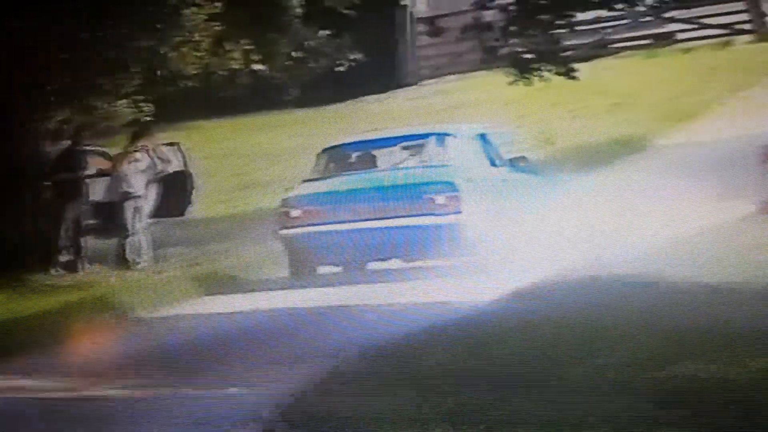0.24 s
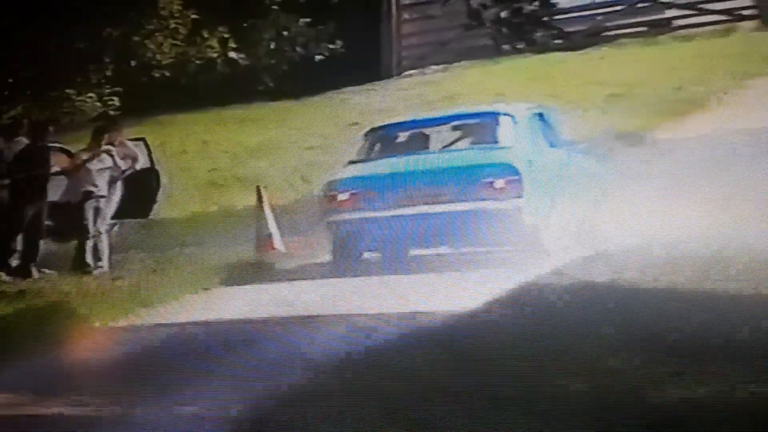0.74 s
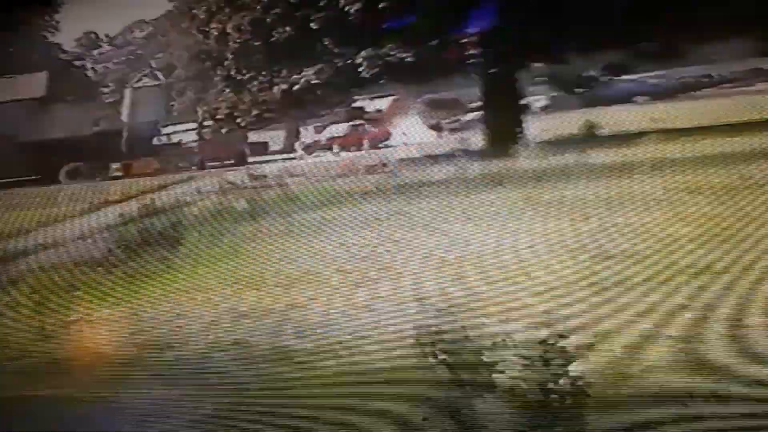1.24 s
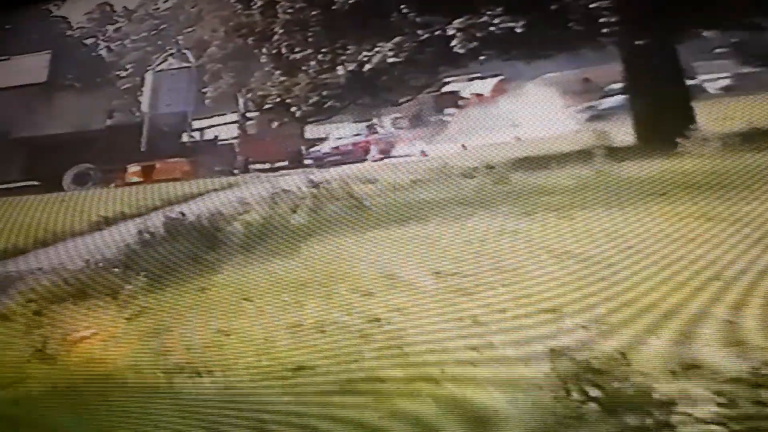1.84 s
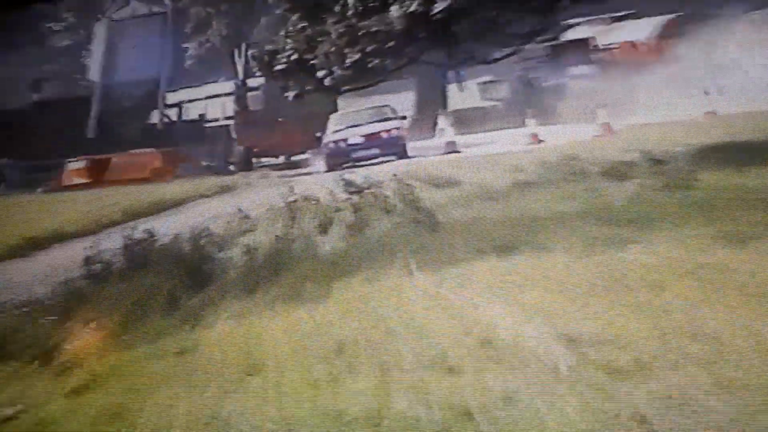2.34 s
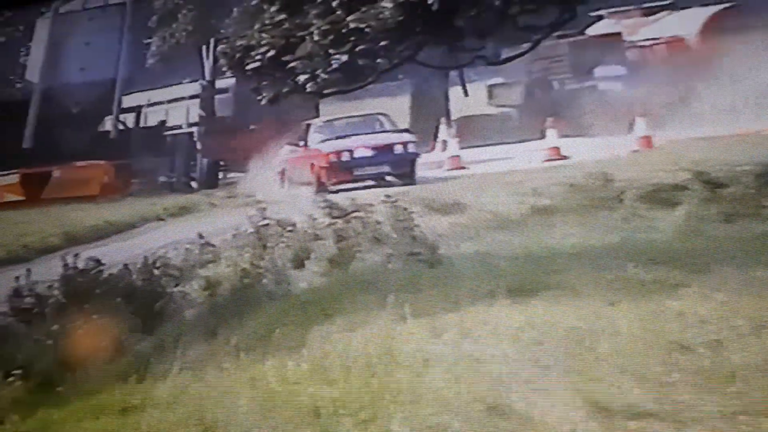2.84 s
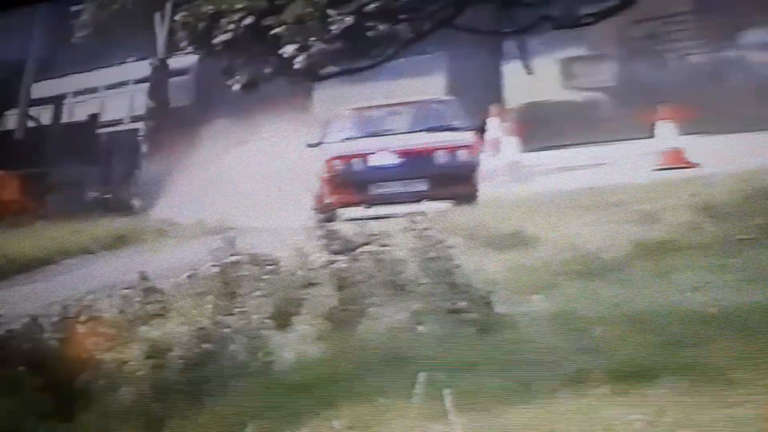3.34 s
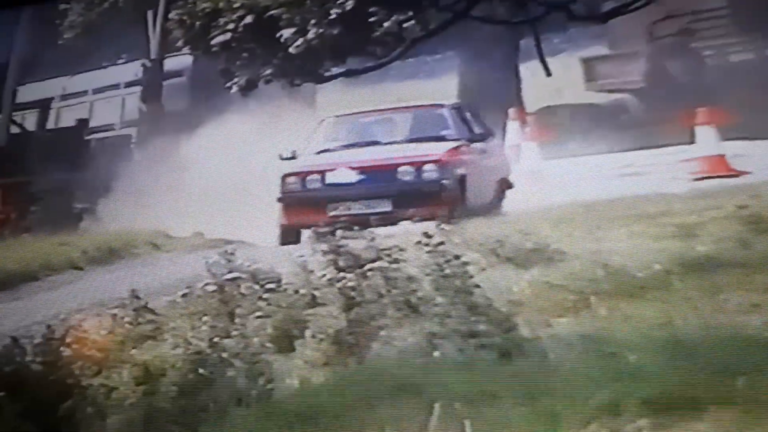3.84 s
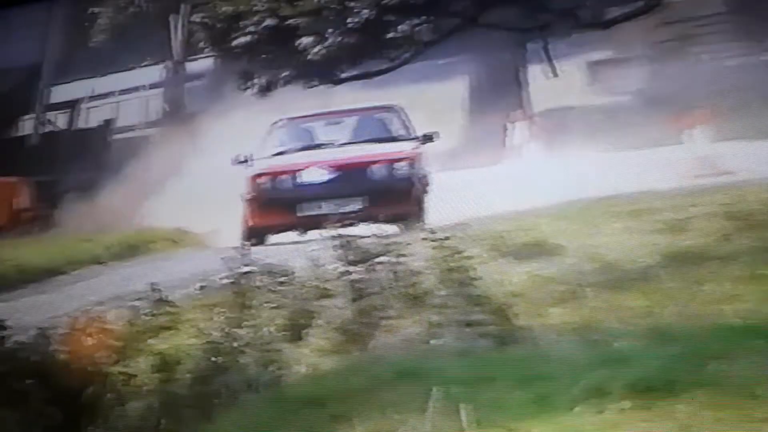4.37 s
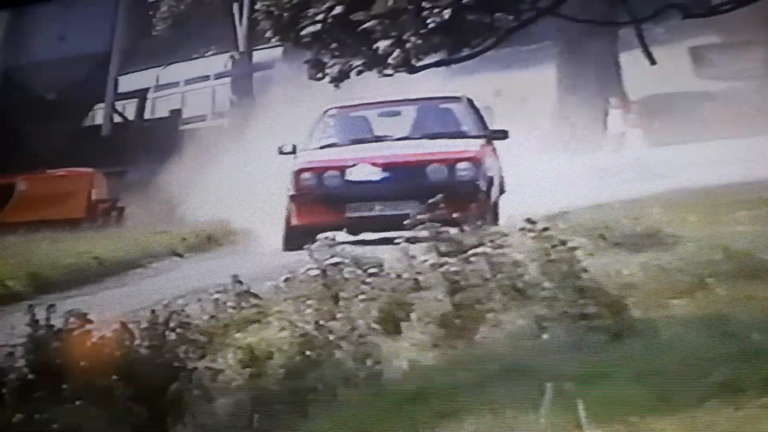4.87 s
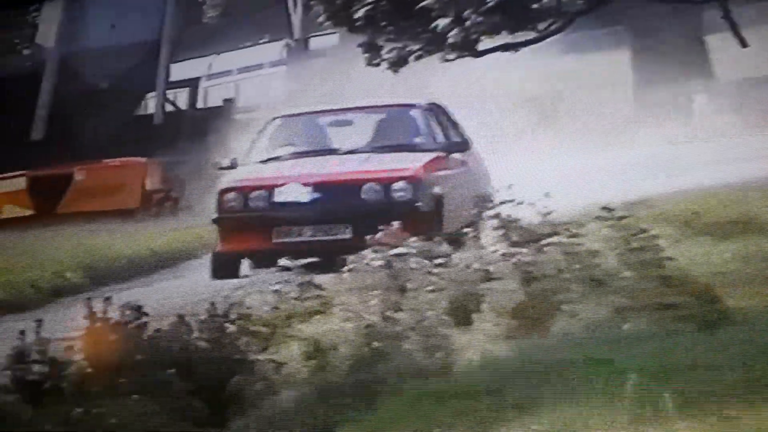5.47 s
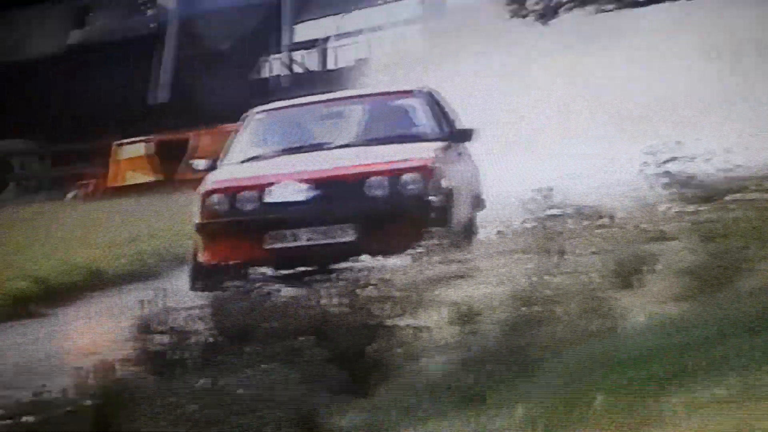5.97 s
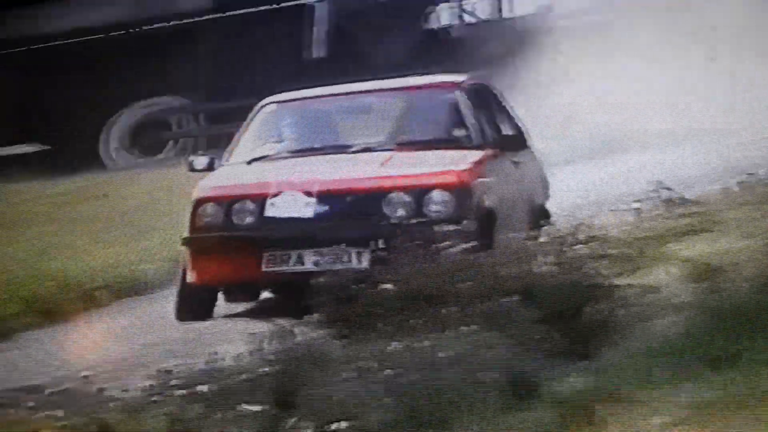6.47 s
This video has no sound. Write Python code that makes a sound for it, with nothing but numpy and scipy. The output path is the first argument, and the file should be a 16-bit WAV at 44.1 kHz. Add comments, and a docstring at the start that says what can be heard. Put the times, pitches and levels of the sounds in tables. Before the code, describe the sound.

Outdoors on a loose-surfaced track, tyres screech loudly at once and die away within a second. A low pop marks a sudden change to near quiet. A second car's engine builds from the distance, climbs in revs, drops and climbs again, sinks, then growls loudly close by. Gravelly exhaust roar, echoes and a few stone ticks surround it. The sound is thin and hollow, as through a small loudspeaker.

```python
"""A car engine revs up and down: shaft orders and firing-modulated noise, its firing tone beating against an echo.
Before it, tyres squeal away by stick-slip, several detuned tread blocks beating together; a low pop lies between.
Flung stones tick; a low rumble, a faint treble hiss and a steady room murmur lie beneath.
The engine, tyres and stones pass a comb of fixed notches; a small loudspeaker then sheds the deep bass of all."""
import sys
import numpy as np
from scipy import signal
from scipy.fft import rfft, irfft, next_fast_len
from scipy.io import wavfile
from scipy.ndimage import uniform_filter1d, minimum_filter1d, map_coordinates

SR = 44100
rng = np.random.default_rng(int(sys.argv[2]) if len(sys.argv) > 2 else 0)


def generate_wav(signal):
    """Clip the signal to [-1, 1] and save it as 16-bit WAV at the path in sys.argv[1]."""
    frames = np.transpose(np.atleast_2d(signal))
    scaled = np.clip(frames, -1, 1) * 32767
    pcm = np.round(scaled).astype(np.int16)
    wavfile.write(sys.argv[1], SR, pcm)


def voltage_ratio(decibels):
    """Convert decibels (scalar or array-like) to amplitude ratios, 20 dB per decade."""
    exponent = np.asarray(decibels, float) / 20
    return 10 ** exponent


N = 295911  # samples

# Source levels are those ahead of the notches, flutter and loudspeaker; spectra give gains ahead of rms scaling.
# Firing tone of the engine: [t/s, f/Hz, level/dB]
FIRING_TONE = [(1.3, 128, -48.5), (1.65, 136.8, -40), (1.93, 126.9, -40), (2.45, 160, -29.5),
               (2.56, 167.5, -22.5), (2.7, 170.6, -19.5), (2.83, 196.4, -14.5), (2.92, 197.8, -15),
               (3.0, 195.7, -16.5), (3.22, 204.8, -19), (3.38, 220, -13), (3.43, 212, -19),
               (3.48, 202, -12), (3.55, 198.3, -13.5), (3.7, 215, -14.5), (4.08, 241, -18.5),
               (4.2, 225, -20.5), (4.36, 199.2, -17.5), (4.57, 184.6, -18.5), (4.81, 157, -19),
               (5.06, 139.3, -24), (5.33, 148.5, -22), (5.47, 155.1, -13.5), (5.62, 154, -21.5),
               (5.74, 154.2, -12.5), (5.92, 159.3, -12.5), (6.06, 165.9, -12), (6.25, 165.7, -11.5),
               (6.37, 185, -9.5), (6.48, 173.4, -13.5), (6.57, 176.5, -6), (6.71, 182.6, -16.5)]
# Single orders that boom out for a while: [middle t/s, length/s, multiple of firing rate/1, level/dB]
ORDER_BOOMS = [(1.68, .3, 2, -34.5), (2.247, .3, 2, -35), (3.55, 0.23, 2, -32), (4.08, 0.16, 2, -20),
               (5.204, 0.24, 2, -26), (5.774, 0.22, 2, -25), (6.616, 0.17, 2, -23), (3.75, .25, .5, -39.5),
               (4.1, .2, .5, -35.5), (5.373, .95, 1.5, -24), (6.1, 0.47, 1.5, -30), (5.676, .6, 2.5, -25.5),
               (6.53, .2, 2.5, -20.5), (5.13, 0.16, 3, -25), (6.116, .35, 3, -23), (6.399, 0.079, 3, -24.5),
               (5.534, 0.14, 4, -17.5), (5.768, .12, 4, -21), (5.939, 0.14, 4, -16.5), (6.16, .18, 4, -18),
               (6.632, 0.14, 4, -22.5)]
# Firing tone thrown back by the buildings: [t/s, pitch over direct pitch/1, level/dB]
BUILDING_ECHO = [(2.62, 0.98, -15), (2.78, 1, -18), (2.9, .9, -33), (3.05, .94, -18), (3.4, .905, -31),
                 (3.53, .92, -27), (3.6, .94, -17), (3.8, .925, -16.5), (3.95, .915, -20.5),
                 (4.13, .905, -28.5), (4.4, .92, -39), (5.25, .94, -31), (5.6, .865, -28.5), (6.05, 1, -39)]
# Booms sent back by a farther wall: [middle t/s, length/s, multiple of firing rate/1, level/dB]
FAR_WALL_ECHO = [(4.33, .25, 1, -29), (4.65, 0.34, 1, -26.5), (4.21, .1, 2, -25), (6.36, .14, 4, -19),
                 (6.64, 0.39, 1, -19.5)]
# Exhaust pipe ringing when the throttle opens: [middle t/s, length/s, level/dB]
PIPE_RINGS = [(2.62, .2, -22), (2.994, .3, -24), (3.452, 0.28, -23), (3.823, .25, -23.5), (4.63, 0.12, -23)]
# Exhaust roar and tyres on loose ground: [t/s, body level/dB, upper level/dB]
ROAR_LEVELS = [(0.0, -34, -29), (0.07, -34, -27), (0.32, -33.5, -37), (1.03, -32, -40), (1.23, -33.5, -38),
               (1.31, -25.5, -37.5), (1.57, -21.5, -31.5), (2.15, -20.5, -28.5), (2.5, -20, -26.5),
               (2.95, -16, -24), (3.6, -18, -24), (4.2, -18.5, -21.5), (4.32, -19.5, -25),
               (5.1, -19, -27.5), (5.7, -17.5, -25), (6.06, -16.5, -23.5), (6.71, -15, -22)]
# Spectrum of the body of the roar: [f/Hz, gain/dB]
BODY_SPECTRUM = [(150, -80.5), (250, -23.5), (320, -6.5), (438, -4.5), (505, -2.5), (600, -2.5),
                 (670, -0.5), (740, -3.5), (830, -5), (900, -12), (1300, -16), (1700, -46.5), (2860, -120)]
# Spectrum of the upper part of the roar: [f/Hz, gain/dB]
UPPER_SPECTRUM = [(500, -40), (900, 0.5), (1200, -4), (1500, -5), (1910, -10), (2390, -18.5), (2650, -29.5),
                  (2850, -37.5), (3450, -37.5), (3750, -53.5), (4300, -60), (5000, -120)]
# Tread squeal: [t/s, centre f/Hz, fundamental level/dB]
TREAD_SQUEAL = [(0.0, 815, -13), (0.124, 812, -5.5), (0.17, 790, -15), (0.25, 783, -14.5), (0.3, 790, -23),
                (0.38, 812, -21.5), (0.44, 805, -27.5), (0.554, 794, -21.5), (0.62, 787, -28.5),
                (0.9, 775, -44)]
# Flung stones: [t/s, starting noise level/dB ahead of colouring]
STONE_HITS = [(.5876, -38), (3.7762, -25), (6.4972, -21)]
# Colour of a stone's tick, without rms scaling: [f/Hz, gain/dB]
STONE_COLOUR = [(1500, -59.5), (2800, -7.5), (3400, -3), (4100, -23.5), (5000, -0.5), (7000, -3.5), (8200, -35)]
# Low ground and body noise: [t/s, level/dB]
RUMBLE_LEVELS = [(0, -37), (1.2, -44), (1.6, -36.5), (2.3, -34.5), (2.7, -26), (4.5, -30.5), (5.8, -20.5),
                 (6.71, -21.5)]
# Spectrum of the rumble: [f/Hz, gain/dB]
RUMBLE_SPECTRUM = [(30, -55.5), (70, -28.5), (120, -11.5), (167, -2), (264, 0), (320, -15), (400, -40.5),
                   (600, -120)]
# Treble hiss: [t/s, level/dB]
HISS_LEVELS = [(0.0, -70), (1.3, -68), (1.69, -61.5), (2.81, -58.5), (4.06, -57.5), (4.95, -60),
               (5.64, -58.5), (6.71, -59)]
# Spectrum of the hiss: [f/Hz, gain/dB]
HISS_SPECTRUM = [(2500, -59.5), (3700, -16), (4350, -16), (4550, -4.5), (5300, -1), (5750, -3.5),
                 (6250, -1.5), (7400, -6), (8700, -19), (11500, -21), (12500, -24), (15700, -19.5)]
# Spectrum of the room murmur: [f/Hz, gain/dB]
ROOM_SPECTRUM = [(20, -30.5), (40, -16.5), (70, -5.5), (110, 3.5), (140, -7.5), (200, -59.5)]

ECHO_LATE_S, FAR_LATE_S = .08, .17  # delays of the near and the far echo
BOOM_EDGE_S = .065  # rise and fall time of a boom
PIPE_HZ, PIPE_WIDTH_HZ = 665, 70  # resonance and bandwidth of each of two equal stages
SQUEAL_OCTAVE_DB = -17.5  # octave relative to the fundamental
SQUEAL_NARROWS_S = 1.5  # time constant of the narrowing pitch spread
POP_S = 1.2160
NOTCH_HZ = 149.8  # spacing
ROOM_DB = -48.5


def unit(x):
    """Normalisation to unit rms."""
    return x / np.sqrt(np.mean(x ** 2) + 1e-20)


def curves(rows):
    """Linear interpolation of each column after the time, followed by a gate open inside the table."""
    s, *cols = np.transpose(rows)
    t = np.arange(N) / SR
    inside = np.minimum(t - s[0], s[-1] - t) / .04
    # no fade where a table meets the start or end of the whole sound
    gate = np.clip(inside + (t < .04) + (t > N / SR - .05), 0, 1)
    return [np.interp(t, s, c) for c in cols] + [gate]


def wobble(rate):
    """Smooth random fluctuation: a spline through rate random knots a second."""
    knots = rng.standard_normal(int(N * rate / SR) + 4)
    return map_coordinates(knots, [np.arange(N) * rate / SR])


def filtered(x, response):
    """Linear filtering: the spectrum times a complex response of frequency."""
    m = next_fast_len(N + 8192)
    spectrum = rfft(x, m) * response(np.fft.rfftfreq(m, 1 / SR))
    return irfft(spectrum, m)[..., :N]


def coloured(x, points):
    """Spectral shaping by gain points joined on a logarithmic frequency axis."""
    f, db = np.transpose(points)
    return filtered(x, lambda hz: voltage_ratio(np.interp(np.log(hz + 1), np.log(f + 1), db)))


def coloured_noise(points, swell=1):
    """Shaped random noise of unit rms, amplitude-modulated by swell before shaping."""
    return unit(coloured(swell * rng.standard_normal(N), points))


def turns(hz):
    """Phase in radians as the running integral of frequency."""
    return 2 * np.pi * np.cumsum(hz) / SR


def tone(phase, db, flutter_db):
    """Amplitude fluctuation: a sine of rms level db before a small random flutter."""
    level = voltage_ratio(db + flutter_db * wobble(25))
    return np.sqrt(2) * level * np.sin(phase + rng.uniform(0, 2 * np.pi))


def window(middle, length):
    """Sine-squared envelope: rises, holds and falls, at half amplitude length seconds apart."""
    t = np.arange(N) / SR
    edge = np.clip((length / 2 - np.abs(t - middle)) / BOOM_EDGE_S + .5, 0, 1)
    return np.sin(np.pi / 2 * edge) ** 2


def later(x, seconds):
    """Propagation delay of a curve."""
    t = np.arange(N) / SR
    return np.interp(t - seconds, t, x)


def engine():
    """Periodic combustion: shaft orders and echoes, with noise modulated at the firing rate."""
    hz, first_db, gate = curves(FIRING_TONE)
    phase = turns(hz * (1 + 0.0037 * wobble(40)))
    direct = gate * tone(phase, first_db, 1.5) + booms(ORDER_BOOMS, phase)
    far_echo = booms(FAR_WALL_ECHO, later(phase, FAR_LATE_S))
    # cylinders differ, so the swell also repeats at half and quarter of the firing rate
    swell = 1 + 0.3 * np.cos(phase) + 0.1 * np.cos(phase / 2) + 0.052 * np.cos(phase / 4)
    return direct + far_echo + building_echo(hz) + roar(swell) + pipe(swell)


def booms(rows, phase):
    """Harmonic orders: each multiple of the firing rate sounds during its booms."""
    half_orders = np.array([round(2 * row[2]) for row in rows])
    strengths = np.array([voltage_ratio(db) * window(s, length) for s, length, _, db in rows])
    total = np.zeros(N)
    for h in np.unique(half_orders):
        total += strengths[half_orders == h].sum(axis=0) * tone(h / 2 * phase, 0, 2.2)
    return total


def building_echo(hz):
    """Doppler shift: the buildings return a mostly lower firing tone as the car runs away from them."""
    ratio, db, gate = curves(BUILDING_ECHO)
    return gate * tone(turns(ratio * later(hz, ECHO_LATE_S)), db, 3.2)


def roar(swell):
    """Amplitude modulation: two bands of exhaust and tyre noise swell with every firing."""
    body_db, upper_db, _ = curves(ROAR_LEVELS)
    body = coloured_noise(BODY_SPECTRUM, swell)
    upper = coloured_noise(UPPER_SPECTRUM, swell)
    return voltage_ratio(body_db + 0.88 * wobble(6.8)) * body + voltage_ratio(upper_db + 0.9 * wobble(12)) * upper


def pipe(swell):
    """Resonance: the firing-modulated noise rings the exhaust pipe through two equal stages."""
    def resonance(f):
        loss = 1j * f * PIPE_WIDTH_HZ
        return (loss / (PIPE_HZ ** 2 - f * f + loss)) ** 2
    ringing = unit(filtered(swell * rng.standard_normal(N), resonance))
    return sum(voltage_ratio(db) * window(s, length) for s, length, db in PIPE_RINGS) * ringing


def squeal(count=9):
    """Stick-slip oscillation: tread blocks wander near one pitch, so they beat against each other."""
    hz, db, gate = curves(TREAD_SQUEAL)
    # the blocks draw together in pitch
    spread = np.exp(-np.arange(N) / SR / SQUEAL_NARROWS_S)
    detune = .13 * np.linspace(-1, 1, count)
    phases = []
    for d in detune:
        own_offset = spread * (d + 0.0421 * wobble(200))
        phases.append(turns(hz * (1 + own_offset + 0.0119 * wobble(40.03))))
    shares = np.exp(-(detune / 0.099) ** 2)
    fundamental = unit(sum(g * np.sin(p) for g, p in zip(shares, phases)))
    octave = unit(sum(g * np.sin(2 * p) for g, p in zip(shares, phases)))
    return gate * voltage_ratio(db) * (fundamental + voltage_ratio(SQUEAL_OCTAVE_DB) * octave)


def stones():
    """Impact: short bright noise bursts with exponential decay."""
    ticks, t = np.zeros(N + SR), np.arange(SR // 50) / SR
    for s, db in STONE_HITS:
        decay = voltage_ratio(db - 60 * t / .004)  # 60 dB in 4 ms
        ticks[round(s * SR):][:len(t)] += decay * rng.standard_normal(len(t))
    return coloured(ticks[:N], STONE_COLOUR)


def notches(hz):
    """Comb interference: an inverted delayed copy, partly fed back, leaves narrow dips between flat tops."""
    late = np.exp(-2j * np.pi * hz / NOTCH_HZ)
    return (1 - 0.89 * late) / (1 - 0.48 * late) * voltage_ratio(-1.17)


def pop():
    """Transient excursion: a kicked loudspeaker cone makes a few swings, each slower than the last."""
    t = np.maximum(np.arange(N) / SR - POP_S, -.0022)
    swing = np.sin(np.pi * np.log1p(t / .0087) / np.log(1.27))
    onset = np.clip((t + .0022) / .0015, 0, 1)
    return voltage_ratio(-10.2) * swing * onset * np.exp(-(t / .0135) ** 2)


def rumble():
    """Low-frequency random vibration: ground and body noise of slowly varying level."""
    db, _ = curves(RUMBLE_LEVELS)
    return voltage_ratio(db + 1.0 * wobble(6)) * coloured_noise(RUMBLE_SPECTRUM)


def hiss():
    """High-frequency random noise: a faint smooth hiss with a slow level curve."""
    db, _ = curves(HISS_LEVELS)
    return voltage_ratio(db) * coloured_noise(HISS_SPECTRUM)


def room():
    """Stationary random noise: a steady low murmur of air."""
    return voltage_ratio(ROOM_DB) * coloured_noise(ROOM_SPECTRUM)


def scene():
    """Superposition: engine, tyres and stones through the notches, then the other sounds."""
    notched = filtered(engine() + squeal() + stones(), notches)
    return (notched + pop() + rumble() + hiss() + room())[None]


def top_cut(x):
    """Nothing passes above the cut-off."""
    return signal.sosfilt(signal.butter(12, 15719, fs=SR, output="sos"), x)


def record(dry):
    """Second-order bass roll-off of the loudspeaker, then peak limiting below full scale."""
    sound = filtered(dry, lambda hz: (1j * hz / (45 + 1j * hz)) ** 2)
    needed_gain = np.minimum(1, .98 / (np.abs(sound) + 1e-9))
    # hold the lowest gain around each peak, then smooth it
    gain = uniform_filter1d(minimum_filter1d(needed_gain, size=801), size=401)
    mix = sound * gain
    return top_cut(mix)


dry = scene()
out = record(dry)
generate_wav(out)
```